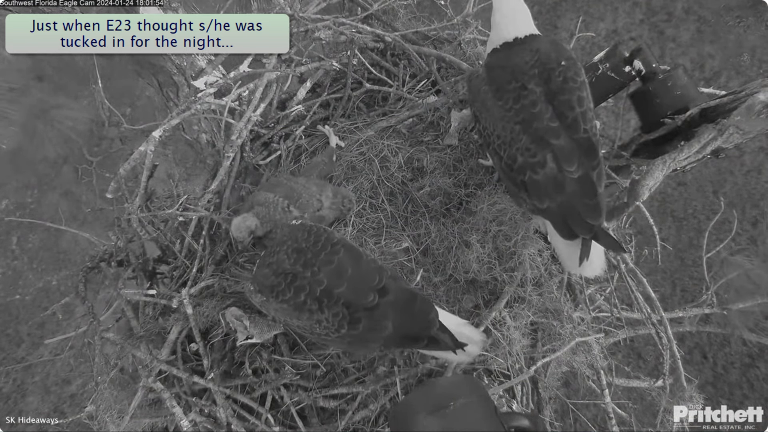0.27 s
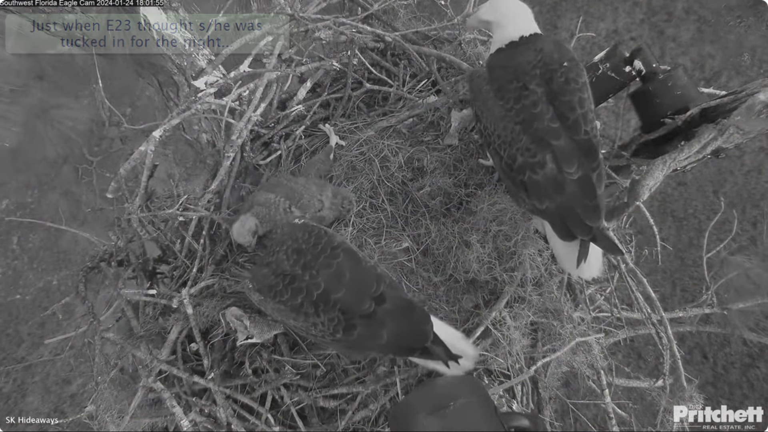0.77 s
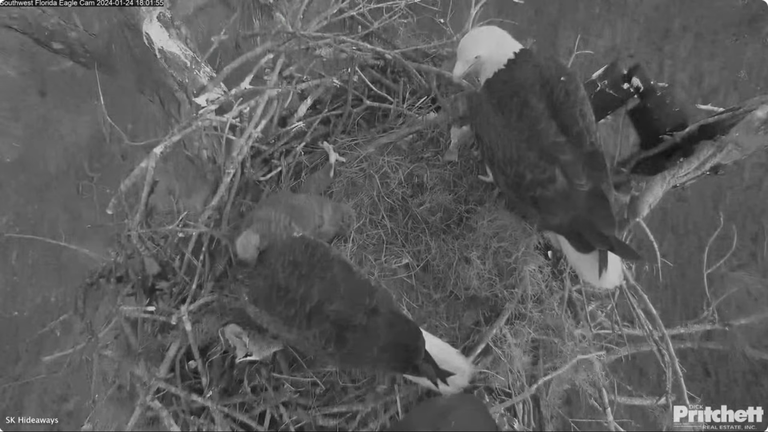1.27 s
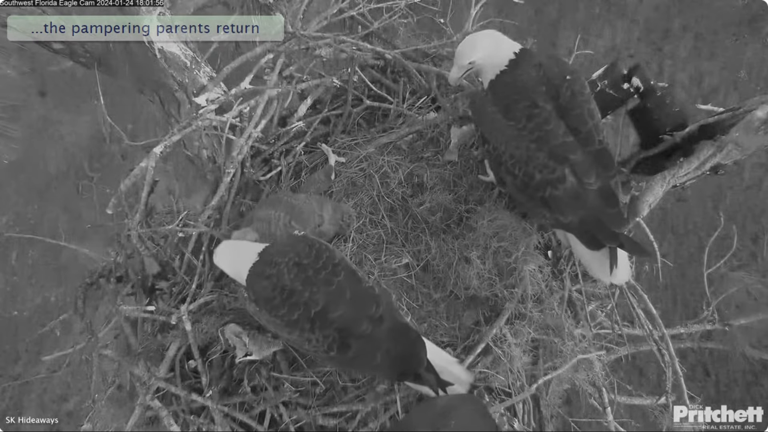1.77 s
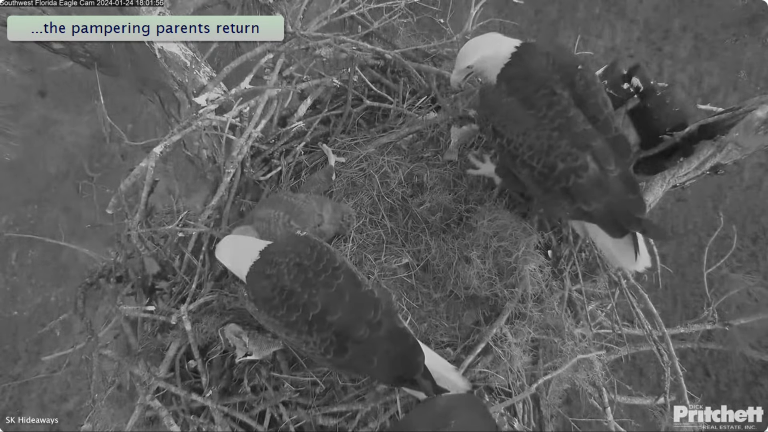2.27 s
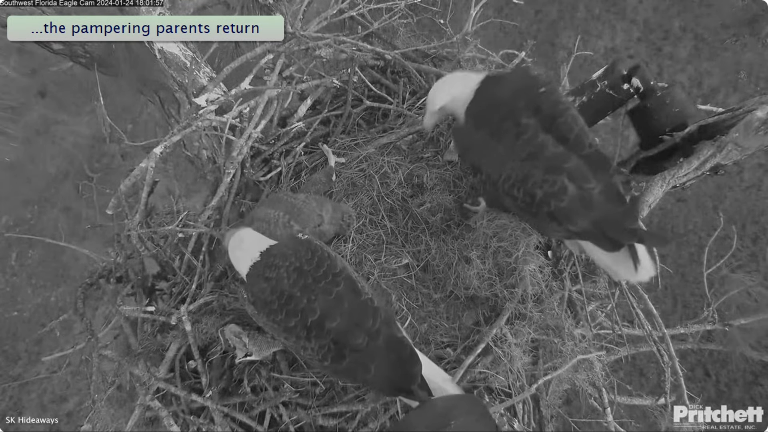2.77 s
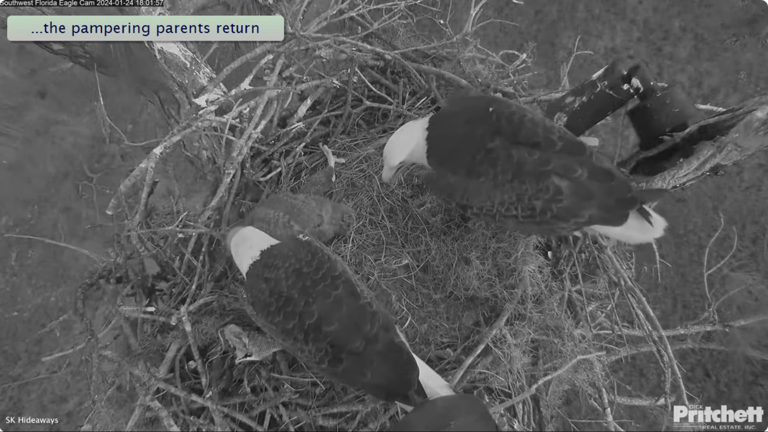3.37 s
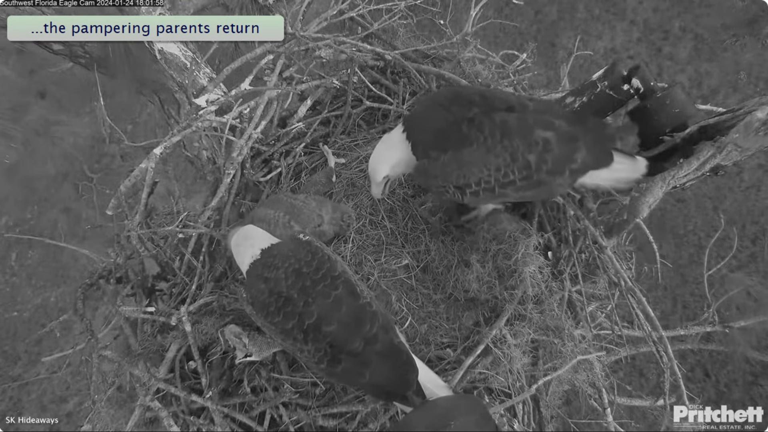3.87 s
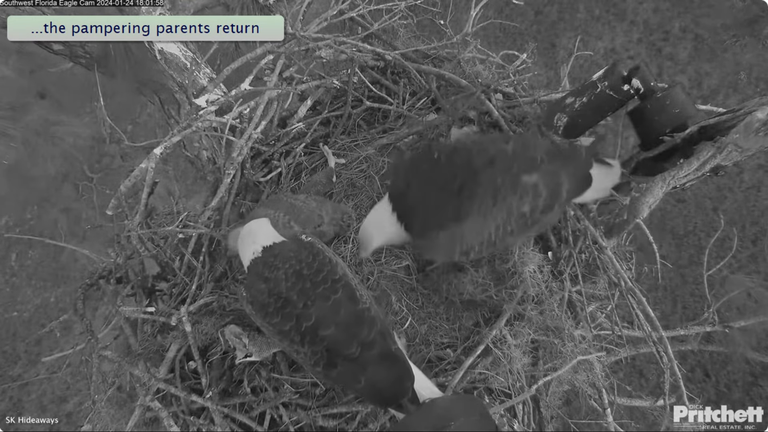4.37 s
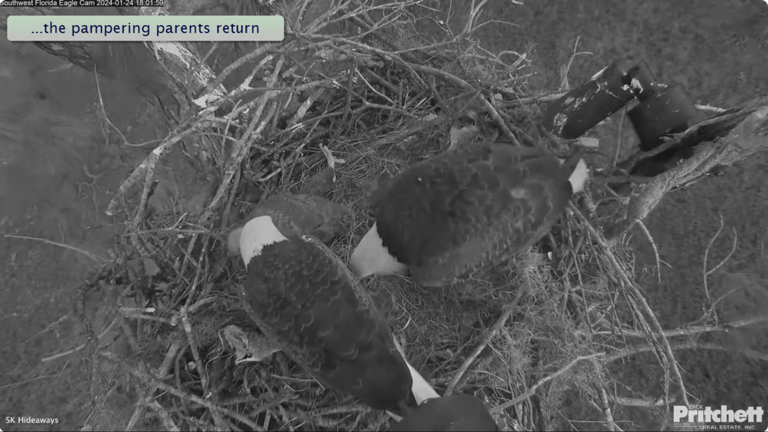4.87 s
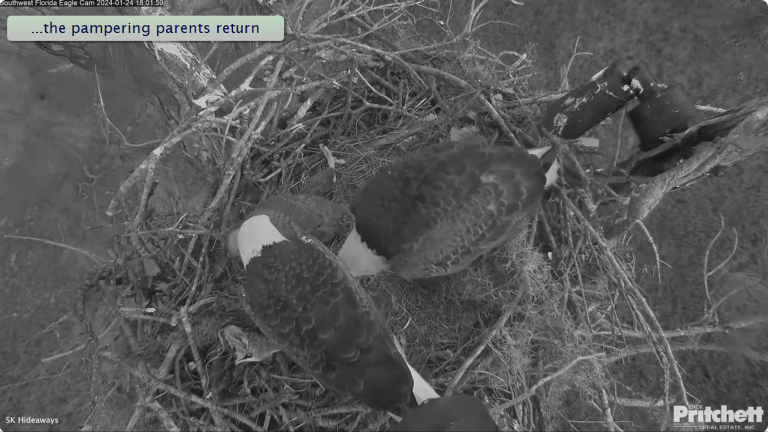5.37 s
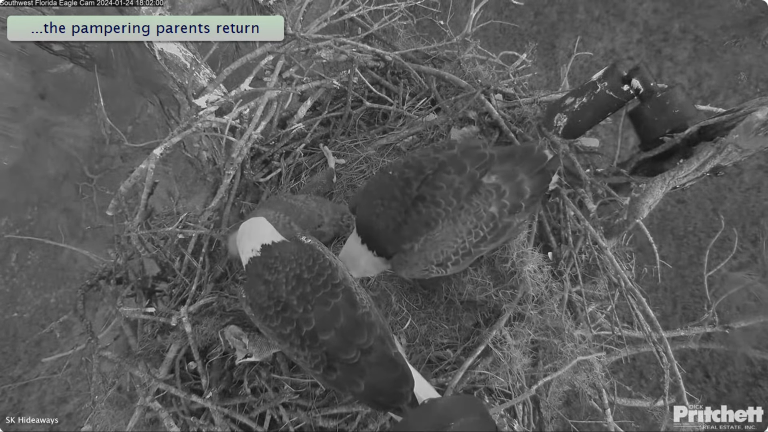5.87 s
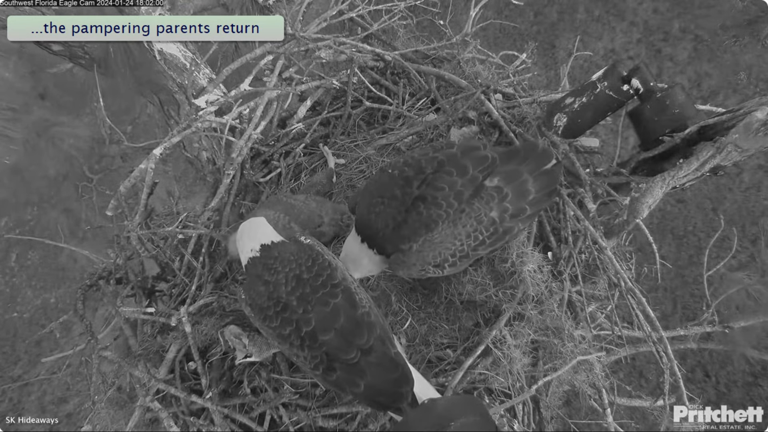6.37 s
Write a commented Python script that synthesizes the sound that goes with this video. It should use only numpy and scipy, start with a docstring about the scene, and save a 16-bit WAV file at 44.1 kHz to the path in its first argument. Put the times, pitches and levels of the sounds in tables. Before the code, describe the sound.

A choppy live feed from a nest: thin, squeaky eagle whistles, some high and clear, some lower and raspy, over a quiet bed of low wind, airy hiss and distant traffic. Calls are busiest and loudest in the first three seconds, peaking in a hoarse yelp with a sharp click. Then they grow weaker and sparser, ending in two very faint chirps. Close microphone, open air, barely any echo, with rapid small gaps and jumps throughout.

```python
"""Two eagles call on their nest near a microphone, with wind, hiss and far traffic behind all through.
Chirps and a low whistle come first; low and high whistles follow, then a swish of feathers near 2.1 s.
A hoarse yelp at 2.7 s ends just after a hard snap; high then low whistles go on, and two chirps close.
Birds are sine waves with overtones, rasp and breath; the background is coloured, flickering noise.
The live feed stutters: short silences and skips ahead cut the sound into pieces."""
import sys
import numpy as np
from scipy import signal
from scipy.fft import rfft, irfft, next_fast_len
from scipy.io import wavfile
from scipy.ndimage import uniform_filter1d, minimum_filter1d

SR = 44100
rng = np.random.default_rng(int(sys.argv[2]) if len(sys.argv) > 2 else 0)


def store_pcm(level_fs):
    """Save levels as 16-bit WAV."""
    pcm = np.round(np.clip(level_fs, -1, 1) * 32767).astype(np.int16)
    wavfile.write(sys.argv[1], SR, np.atleast_2d(pcm).T)


N = 291501  # length in samples

# Wind: colour of its noise [f/Hz, level/dB], and its level without gusts in dB
WIND_COLOUR = [(20, -16), (32, -4.5), (55, -3), (130, -6.5), (250, -14), (450, -22)]
WIND_DB = -62
# Buffets and lulls of wind on the microphone [middle t/s, rise level/dB, half length t/s]
WIND_GUSTS = [(0.205, -2, 0.17), (0.94, 6, 0.072), (1.497, 5.5, 0.22), (1.896, 5, 0.028),
              (2.147, 4.5, 0.11), (2.458, 9.5, 0.068), (2.675, 7, 0.061), (3.124, 12, 0.048),
              (3.809, 13.5, 0.023), (3.993, 7, 0.15), (4.507, 11, 0.09), (4.79, 5, 0.12),
              (5.225, 12.5, 0.031), (5.745, -4, 0.41), (6.193, 4, 0.12)]
# Far traffic: colour of its noise [f/Hz, level/dB per Hz], and its overall level in dB
TRAFFIC_COLOUR = [(120, -44), (200, -9.5), (240, -10.5), (284, -6), (408, -11), (447, -10.5), (988, -3.5),
                  (1550, -8), (1900, -16), (3000, -20), (3900, -51.5), (6600, -120)]
TRAFFIC_DB = -62.5
# Colour of the background hiss [f/Hz, level/dB per Hz]
HISS_COLOUR = [(1180, -35), (2000, -42), (2670, -34), (2980, -12.5), (3260, -3), (5930, -3.5),
               (7250, -15.5), (16000, -44.5)]
# Rise and fall of the background hiss: rustle, and breathy air around some calls;
# background_hiss() lifts it all evenly [t/s, level/dB]
HISS_LEVEL = [(0.0, -81), (0.55, -86), (0.86, -75.5), (1.27, -88), (1.75, -85), (1.86, -83.5),
              (2.69, -77.5), (3.07, -82.5), (4.0, -80.5), (4.34, -79.5), (4.67, -82), (5.03, -73),
              (5.23, -82.5), (5.96, -89.5), (6.61, -82)]
# Feathers brush the twigs [middle t/s, rise of the top treble level/dB, half length t/s]
FEATHER_SWISH = (2.11, 14, 0.061)

# Evenly spaced runs of feed silences [start of the first t/s, count]
SILENCE_RUNS = [(.0699, 2), (.3828, 4), (.9589, 4), (1.5354, 5), (2.2413, 4), (2.8321, 4), (3.4075, 4),
                (3.9841, 4), (4.5597, 4), (5.135, 4), (5.7112, 4), (6.2871, 3)]
SILENCE_EVERY_S, SILENCE_S = .1314, .0176  # spacing and length
# One silence out of step [start t/s, end t/s]
EXTRA_SILENCE = (2.7473, 2.7617)
FIRST_SKIP_S, SECOND_SKIP_S = .064, .114  # time from the end of a silence to further skips
ODD_SKIP_S = 2.783  # one skip out of step, at this time
SNAP_DB, SNAP_S = -25, .00015  # its snap: peak level, decay time
TOP_HZ = 16300  # highest pitch the feed passes

# Long low whistles, one curve each, partials and rasp against the 1st partial
# [t/s, pitch f/Hz, level/dB, 2nd partial level/dB, 3rd partial level/dB, rasp level/dB]
LOW_WHISTLES = [
    [(0.678, 2095, -59.4, -2, -17, -29), (0.684, 1983, -45.5, -1.5, -3, -23),
     (0.7035, 2025, -45, 0, -5.5, -11), (0.762, 1958, -47.5, -3, -8.5, -33),
     (0.7948, 1995, -46, -1, -2, -46), (0.8685, 1996, -47, 1.0, -1.5, -40),
     (0.93, 1994, -49.5, -3.9, -15.5, -42), (1.0095, 1993, -46.5, -4.5, -3, -43),
     (1.022, 2010, -46.5, 1, -6, -13), (1.0395, 2028, -46.5, -5, -7, -8), (1.0399, 2065, -44, 6, -6, -10),
     (1.053, 2078, -43.5, 7, -1.5, -4), (1.0605, 2010, -46.5, -12.0, -11, -8),
     (1.065, 1961, -42.5, -5, -3, -9), (1.0725, 1891, -59, -1.1, -18, -16.4)],
    [(1.485, 2157, -42.5, -19, -49.5, -42.9), (1.4925, 2148, -40, -19, -56, -48),
     (1.5, 2086, -30, -10.5, -15.6, -38), (1.524, 2055, -33.5, -11, -11.5, -28.5),
     (1.566, 2013, -32.5, -13, -12, -39), (1.626, 2016, -35.5, -13, -8.5, -24),
     (1.647, 2037, -34, -12.5, -16.5, -23.8), (1.7472, 2080, -38, -0.5, -19.5, -22)],
    [(4.1968, 2000, -42.5, 1.5, -10.5, -49), (4.2792, 1954, -46.5, 0.5, -10, -30),
     (4.3212, 1970, -43, 1, -13, -24.8), (4.3787, 1961, -48, -1, -24, -21),
     (4.3957, 1972, -42.5, -1, -13, -17), (4.4202, 1996, -41.5, 3.5, -8.5, -24.4),
     (4.4322, 1906, -47, -4, -28, -24.9), (4.44, 1910, -53, -2, -30, -25)],
    [(4.712, 2026, -77, -5, -27, -15), (4.735, 2052, -58.5, -10.5, -27.0, -18),
     (4.744, 2050, -48, 6.5, -17, -34.3), (4.753, 1990, -39.0, 0, -11, -31.3),
     (4.7905, 1927, -47, -0.5, -30.2, -29), (4.8408, 1938, -44.5, -2, -17, -38),
     (4.9195, 1950, -44.5, 1.5, -13, -36), (4.9435, 1950, -48.5, -1.5, -15.3, -32),
     (4.99, 1962, -42, -1, -17, -37), (5.03, 1955, -44.5, 0.5, -14, -31),
     (5.0855, 1970, -42.5, -0.5, -13, -23), (5.0859, 1930, -46, 2.8, -12.5, -23),
     (5.1595, 1977, -47, -2.5, -12.5, -31.1), (5.188, 1933, -44.5, 0.5, -20, -22),
     (5.1985, 1861, -62, 2, -15.8, -13.7)],
]
# The low bird's one hoarse yelp, same columns
HOARSE_YELP = [(2.703, 2214, -62, -6, -27, -4), (2.7176, 2230, -46.7, -8, -27, 3),
               (2.7178, 2258, -39.6, -19, -34, -5), (2.734, 2240, -39.6, -19, -34, -6),
               (2.747, 2216, -36.5, -12, -36, -20), (2.7617, 2228, -33.5, -6, -42, -30),
               (2.7715, 2135, -28, -2, -23, -27), (2.7829, 2116, -27.5, -4, -23, -23),
               (2.783, 1998, -35, -9, -26, -25), (2.7875, 2010, -46, -9, -26, -25),
               (2.792, 2028, -65, -9, -26, -25)]
# High whistles, long ones and one short, one curve each
# [t/s, pitch f/Hz, level/dB, 2nd partial level/dB against the 1st]
HIGH_WHISTLES = [
    [(1.822, 3606, -74, -45), (1.835, 3633, -56, -42), (1.851, 3750, -33, -40), (1.866, 3812, -31.5, -25),
     (1.8807, 3785, -28, -27), (1.895, 3820, -30.5, -19), (1.905, 3679, -37, -16.5),
     (1.915, 3545, -60, -27)],
    [(2.392, 3715, -58, -35), (2.4005, 3670, -34, -31), (2.429, 3752, -33, -21.5),
     (2.4545, 3698, -42.5, -25), (2.4549, 3613, -37, -28.5), (2.5047, 3630, -37.5, -20),
     (2.549, 3645, -37, -16.5), (2.5625, 3700, -36, -20), (2.6615, 3711, -35.5, -16),
     (2.687, 3845, -31.5, -34), (2.7125, 3839, -34.5, -24), (2.726, 3821, -37, -29),
     (2.747, 3644, -42, -16)],
    [(3.1147, 3697, -52.9, -16), (3.155, 3797, -41.7, -14), (3.173, 3689, -45.5, -15.1),
     (3.191, 3525, -63.3, -19), (3.2585, 3624, -65, -1), (3.344, 3583, -65.5, 6), (3.368, 3672, -49.5, -5),
     (3.437, 3602, -61, 3), (3.4535, 3655, -60.5, 4.5), (3.4745, 3736, -50.5, -9.8),
     (3.521, 3668, -50.5, -15), (3.575, 3770, -43, -15.5), (3.587, 3591, -43.5, -11),
     (3.6035, 3669, -76, -8)],
    [(3.958, 3824, -60, -17.4), (3.973, 3782, -49.5, -10.5), (4.009, 3810, -51, -8),
     (4.0285, 3701, -45.5, -13), (4.0435, 3668, -46, -14.8), (4.0645, 3653, -48.5, -20),
     (4.0649, 3670, -50.5, -26), (4.1725, 3637, -47, -20.2), (4.1962, 3597, -52, -27.0)],
]
HIGH_THIRD_DB = -21.5  # their 3rd partial against their 2nd
# Short chirps [start t/s, attack t/s, hold t/s, release t/s, pitch at start f/Hz, held f/Hz, at end f/Hz,
# level/dB, 2nd partial level/dB, 3rd partial level/dB; partials against the 1st]
SHORT_CHIRPS = [(0.12, 0.0065, 0.0008, 0.0078, 3796, 3780, 3850, -41.5, -9, -26),
                (.120, 0.014, 0.008, 0.014, 3086, 2860, 2574, -34.5, 5, -30),
                (.149, 0.0059, .002, 0.016, 1360, 1260, 1076, -39, 2.5, 2.5),
                (0.5947, 0.0022, 0.024, 0.029, 2970, 2880, 2785, -41.5, -1.5, -35),
                (1.383, 0.035, 0.0069, 0.097, 2970, 2990, 2760, -52, -37, -43),
                (1.882, .004, 0.012, .012, 3100, 3060, 3050, -47.5, -33, -40),
                (1.908, 0.011, .001, 0.012, 2130, 2000, 1820, -38, -16, -50),
                (2.2, 0.013, .001, 0.031, 3700, 3685, 3900, -56.5, -32, -51),
                (2.232, 0.011, 0.016, 0.027, 3713, 3720, 3510, -36, -32, -56),
                (2.282, 0.011, .002, 0.032, 3750, 3624, 3640, -38, -30, -60),
                (3.88, 0.011, .004, 0.0097, 4170, 3890, 3698, -53, -10, -26),
                (5.522, 0.045, 0.0032, 0.067, 1183, 1291, 1120, -57.5, 11, 5.5),
                (6.355, .0115, .001, 0.0099, 3700, 3650, 3550, -62, -12, -30)]
CHIRP_FADE_DB = 22  # a chirp rises out of and sinks back to this far under its level
# Strength of the 4th partial and up against the 1st, at full effort [f/Hz, level/dB]
UPPER_PARTIALS = [(5000, -0.5), (6300, -8), (7600, -26.5), (10000, -43), (11800, -36), (15000, -49.5)]
# Extra rasp lines above partials 1 to 5, one value each [level/dB]
RASP_LINES = [-12.5, -1.5, -17.5, -27.5, -21.5]
# Rasp of each low whistle, then of the yelp [place above a partial 0-1, waver as share of the pitch,
# tilt towards the lowest line level/dB, mirrored line under the 3rd partial level/dB]
RASP_SHAPES = [(.5, .035, -3, -13), (.6, .016, 14, 0), (.5, .02, -13, -20), (.5, .02, -3, -20),
               (.4, 0.006, 8.5, -24)]

DULLING = .25  # dB lost per dB of lost effort and per partial
EDGE_S = .0015  # calls open and close over this time
WAVER, SHIMMER_DB = .0017, .75  # pitch drift as a share of the pitch, level shimmer
FRAY_DB = 1.2  # level flicker of the 2nd partial, twice that for the higher ones
HOARSE_UNDER_HZ = 1500  # calls that start lower than this are hoarse
CLEAR_DB, HOARSE_DB = -28, -14  # tremble setting for overtones of clear and hoarse calls without rasp
CLEAR_BREATH_DB, HOARSE_BREATH_DB = -48, -20  # airflow noise of clear and hoarse calls


def undb(db):
    """Turn a level in dB into a plain gain."""
    return 10 ** (np.asarray(db) / 20)


def on_log(hz, points):
    """Read a curve of (Hz, dB) points along a log-frequency axis, as the ear spaces pitch."""
    points = np.array(points)
    return np.interp(np.log(hz), np.log(points[:, 0]), points[:, 1])


def bump(middle_s, half_s):
    """A smooth hump in time that rises from 0 to 1 and sinks again."""
    return np.exp(-((np.arange(N) / SR - middle_s) / half_s) ** 2)


def walk(rate):
    """Random levels, `rate` new ones a second, smoothed twice into an unsteady curve of spread 1."""
    step = int(SR / rate)
    held = np.repeat(rng.standard_normal(N // step + 1), step)
    smooth = uniform_filter1d(uniform_filter1d(held, step), step)[:N]
    return smooth / smooth.std()


def silences():
    """Start and end times of every silence of the feed."""
    start = np.concatenate([first + SILENCE_EVERY_S * np.arange(count) for first, count in SILENCE_RUNS])
    end = start + SILENCE_S
    return np.sort(np.append(start, EXTRA_SILENCE[0])), np.sort(np.append(end, EXTRA_SILENCE[1]))


def skips():
    """Count, at each sample, how often the feed has jumped ahead so far."""
    start, end = silences()
    next_start = np.append(start[1:], N / SR)
    times = [end, [ODD_SKIP_S]]
    for delay in (FIRST_SKIP_S, SECOND_SKIP_S):
        later = end + delay
        times.append(later[later < next_start - .03])  # only where there is room before the next silence
    return np.searchsorted(np.sort(np.concatenate(times)), np.arange(N) / SR)


def noise(colour, jumps, flicker_db, rate):
    """Coloured noise of spread 1 in octave bands that flicker separately, cut and rejoined at each skip."""
    size = next_fast_len(2 * N)
    hz = np.maximum(np.fft.rfftfreq(size, 1 / SR), 1)
    spectrum = rfft(rng.standard_normal(size)) * undb(on_log(hz, colour))
    heard = np.arange(N) + 2048 * jumps  # each skip leaves out 2048 samples
    out = np.zeros(N)
    for octave in np.arange(np.log2(colour[0][0]) // 1, np.log2(colour[-1][0]) + 1):
        share = np.cos(np.pi / 2 * np.clip(np.log2(hz) - octave, -1, 1)) ** 2  # bands overlap softly
        band = irfft(spectrum * share, size)[heard]
        out += band * undb(flicker_db * walk(rate))
    return out / out.std()


def traffic(jumps):
    """Far traffic: a steady, gently flickering roar of many sounds blended into noise."""
    return noise(TRAFFIC_COLOUR, jumps, 1, 13) * undb(TRAFFIC_DB)


def wind(jumps):
    """Wind on the microphone: deep noise that swells in gusts and sinks in lulls."""
    level_db = WIND_DB + sum(rise * bump(middle, half) for middle, rise, half in WIND_GUSTS)
    return noise(WIND_COLOUR, jumps, 2.1, 14) * undb(level_db)


def background_hiss(jumps):
    """Rustle, and breathy air around some calls, as one hiss; a swish of feathers brightens the top treble."""
    level_db = np.interp(np.arange(N) / SR, *np.transpose(HISS_LEVEL)) + 10
    hiss = noise(HISS_COLOUR, jumps, 2.1, 38) * undb(level_db)
    treble = signal.butter(2, 8500, "high", fs=SR, output="sos")
    airy = signal.sosfilt(treble, rng.standard_normal(N))
    middle, rise, half = FEATHER_SWISH
    return hiss + airy * undb(-90 + rise * bump(middle, half))


def snap():
    """The out-of-step skip lands with a hard snap: a sudden step that dies away at once."""
    after = np.arange(N) / SR - ODD_SKIP_S
    return -undb(SNAP_DB) * np.exp(-np.abs(after) / SNAP_S) * (after >= 0)


def echo(birds):
    """Branches return a faint echo: many random reflections that die away within 0.05 s."""
    lag = np.arange(SR // 10) / SR
    reflections = rng.standard_normal(len(lag)) * np.exp(-np.log(1000) * lag / .05)
    return undb(-45) * signal.fftconvolve(birds, reflections)[:N]


def chirp(start, attack, hold, release, hz_from, hz, hz_to, db, second, third):
    """Curve of a chirp; overtones die faster than the first partial when the effort sinks."""
    under = CHIRP_FADE_DB * np.array([1, 0, 0, 1])
    times = start + np.cumsum([0, attack, hold, release])
    return np.transpose([times, [hz_from, hz, hz, hz_to], db - under,
                         second - DULLING * under, third - 2 * DULLING * under])


def rasp_lines(hz, turn, unsteady, shape):
    """The other side of the syrinx, the bird's voice organ, adds unsteady lines between the partials."""
    place, rasp_waver, tilt_db, mirror_db = shape
    beat = np.cumsum(2 * np.pi * hz * (place + rasp_waver * unsteady) / SR)
    lines = undb(mirror_db) * np.sin(3 * turn - beat)
    for k, db in enumerate(RASP_LINES):
        lines = lines + undb(db + tilt_db * (k == 0)) * np.sin((k + 1) * turn + beat)
    return lines


def call_edge(i, j, jumps):
    """Fade a call in and out softly, but leave an end that falls on a skip abrupt."""
    steps = np.arange(j - i)
    fades = []
    for distance, at in ((steps, i), (steps[::-1], j)):
        on_skip = jumps[at - 60] != jumps[at + 60]
        fades.append(np.clip(distance / SR / EDGE_S, on_skip, 1))
    return np.minimum(*fades)


def bird(calls, jumps, rasps=None):
    """A near-sine whistle with overtones; uneven airflow blurs them into breath, and rasp may be added."""
    out = np.zeros(N)
    # each skip throws the wave to another point of its cycle
    lost = np.cumsum(rng.uniform(np.pi / 4, 7 * np.pi / 4, jumps[-1] + 1))[jumps]
    walks = [walk(rate) for rate in (150, 110, 400, 200, 2500)]
    whole_unsteady = walks[2]
    for n, call in enumerate(calls):
        times, *columns = np.transpose(call)
        i, j = round(times[0] * SR), round(times[-1] * SR)
        hz, db, second, third, *rasp = (np.interp(np.arange(i, j) / SR, times, c) for c in columns)
        drift, flutter, unsteady, patchy, breath = (w[i:j] for w in walks)
        hoarse = hz[0] < HOARSE_UNDER_HZ

        # the 4th partial and up lose level where the effort is under its nearby top
        slack = db + minimum_filter1d(-db, size=2000)
        upper = [on_log(k * hz.mean(), UPPER_PARTIALS) + DULLING * (k - 1) * slack
                 for k in range(4, int(TOP_HZ / hz.max()) + 1)]
        partial_db = db + np.array([0 * db, second, third] + upper)

        turn = np.cumsum(2 * np.pi * hz * (1 + WAVER * drift) / SR) + lost[i:j]
        # overtones tremble in phase, the high ones most
        tremble_db = rasp[0] / 2 if rasp else HOARSE_DB if hoarse else CLEAR_DB
        grain = 0.29 * undb(tremble_db) * (unsteady + breath / 2)
        partials = []
        for k, level_db in enumerate(partial_db):
            fray_db = FRAY_DB * min(k, 2) * np.roll(whole_unsteady, 5000 * k)[i:j]
            phase = (k + 1) * turn + k * (1 - np.pi) + k * grain
            partials.append(undb(level_db + fray_db) * np.sin(phase))
        tone = sum(partials) * undb(SHIMMER_DB * flutter)

        breath_gain = undb(HOARSE_BREATH_DB if hoarse else CLEAR_BREATH_DB)
        if rasp:
            lines = rasp_lines(hz, turn, unsteady, rasps[n])
            tone += undb(db + rasp[0] + 4.4 * patchy) * lines  # the rasp comes in patches
            breath_gain = breath_gain + undb(rasp[0] - 11)
        # uneven airflow spreads the overtones into noise
        overtones = sum(partials[1:]) / np.hypot(undb(second), undb(third))
        airflow = breath_gain * breath * overtones
        # root 2 makes the levels those of a sine's rms
        out[i:j] += call_edge(i, j, jumps) * np.sqrt(2) * (tone + airflow)
    return out


def scene():
    """Both birds and their echo add up with the snap, wind, hiss and traffic at the microphone."""
    jumps = skips()
    background = traffic(jumps) + wind(jumps) + background_hiss(jumps)
    high = [[(*row, row[-1] + HIGH_THIRD_DB) for row in call] for call in HIGH_WHISTLES]
    chirps = [chirp(*row) for row in SHORT_CHIRPS]
    birds = bird(LOW_WHISTLES + [HOARSE_YELP], jumps, RASP_SHAPES) + bird(high + chirps, jumps)
    return (background + birds + echo(birds) + snap())[None]


def record(dry):
    """The feed mutes each silence; a bass cut after it lets the last value ring out; the top is dulled and cut."""
    borders = np.ravel(np.transpose(silences()))
    live = np.searchsorted(borders, np.arange(N) / SR) % 2 == 0
    x = signal.sosfilt(signal.butter(2, 38, "high", fs=SR, output="sos"), dry * live)
    x = signal.sosfilt(signal.butter(2, 11500, fs=SR, output="sos"), x)
    x = x + undb(-101) * rng.standard_normal(x.shape)  # converter hiss
    return signal.sosfilt(signal.ellip(10, .2, 80, TOP_HZ, fs=SR, output="sos"), x)


dry = scene()
out = record(dry)
store_pcm(out)
```